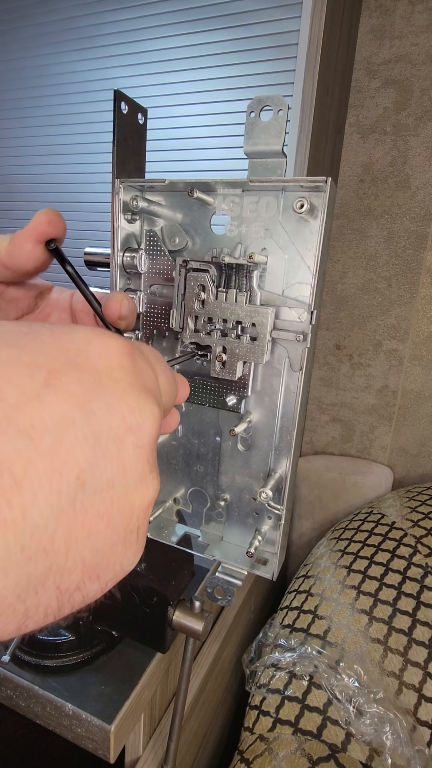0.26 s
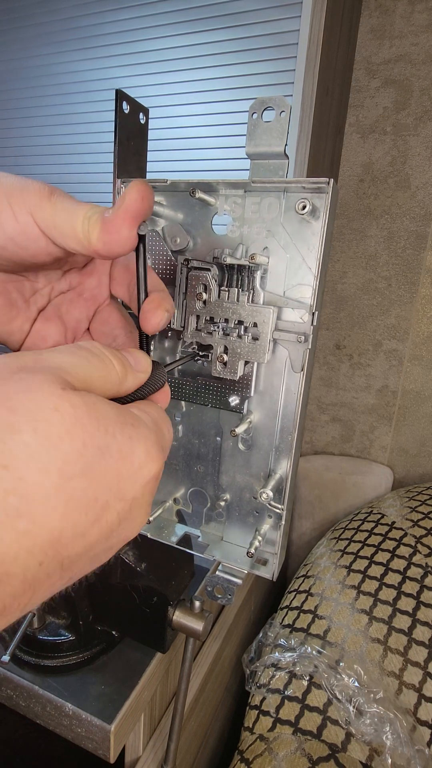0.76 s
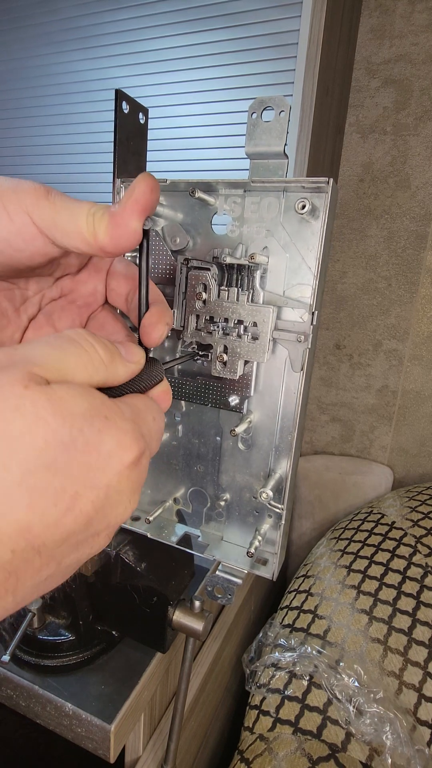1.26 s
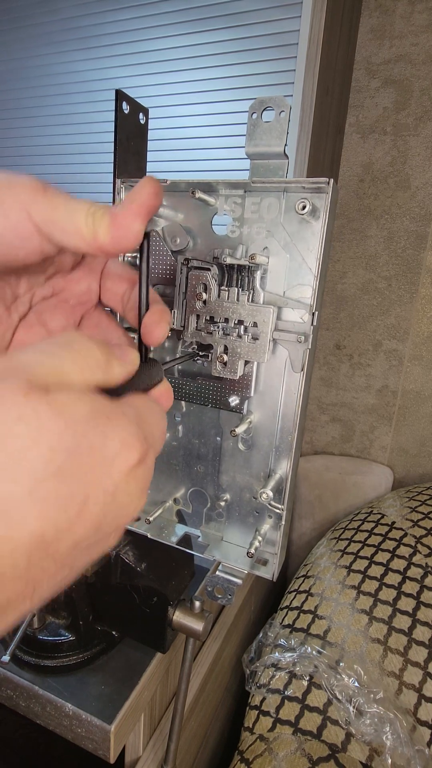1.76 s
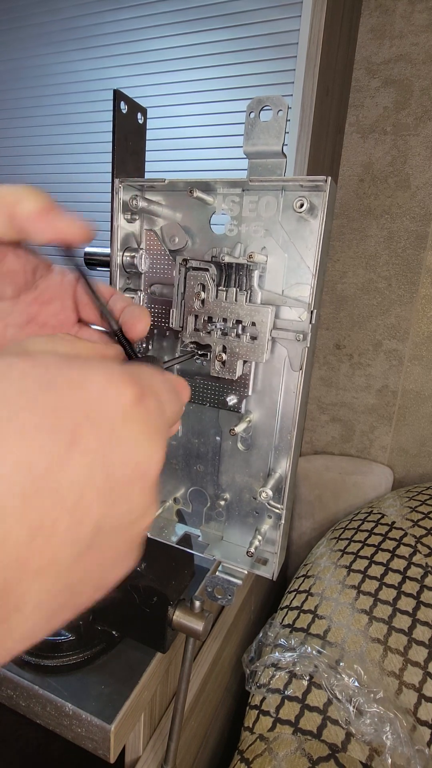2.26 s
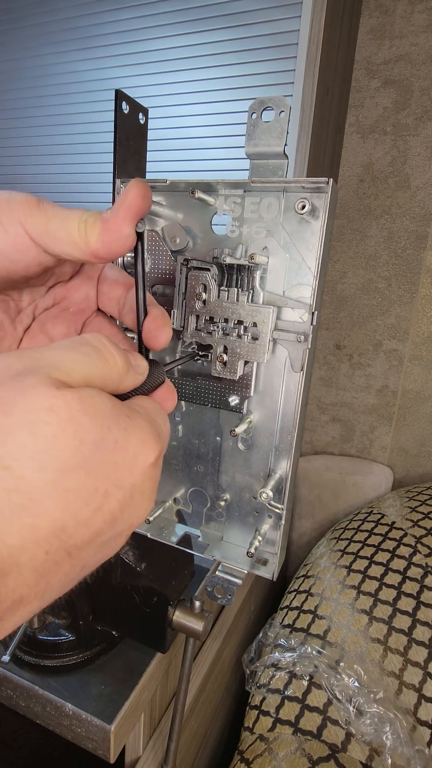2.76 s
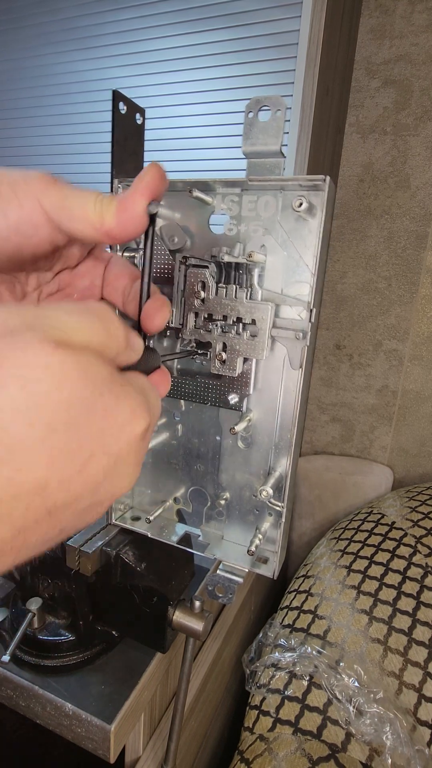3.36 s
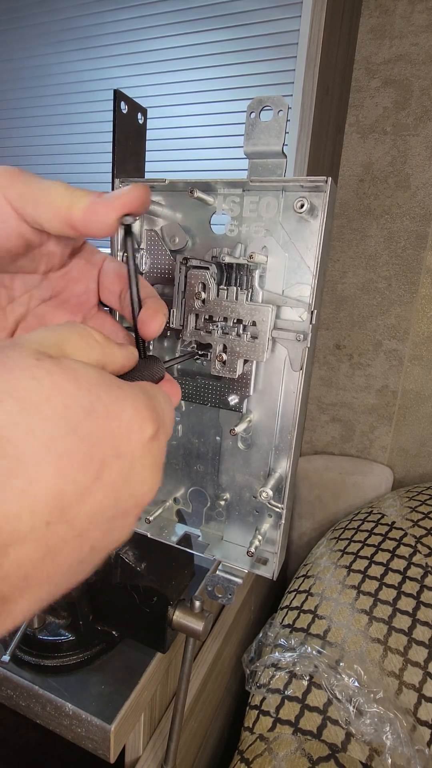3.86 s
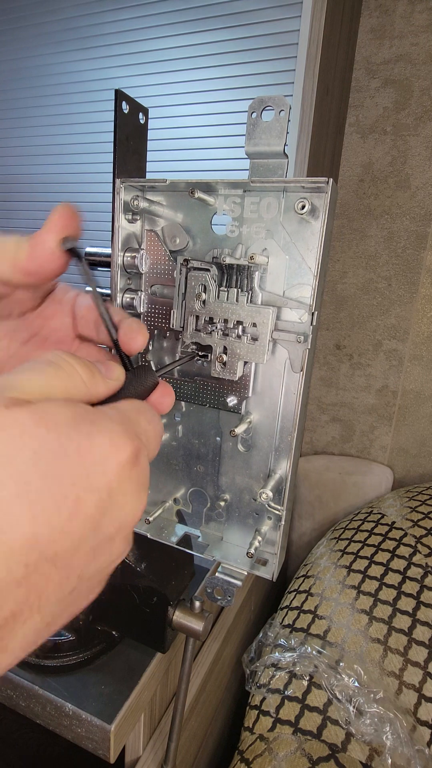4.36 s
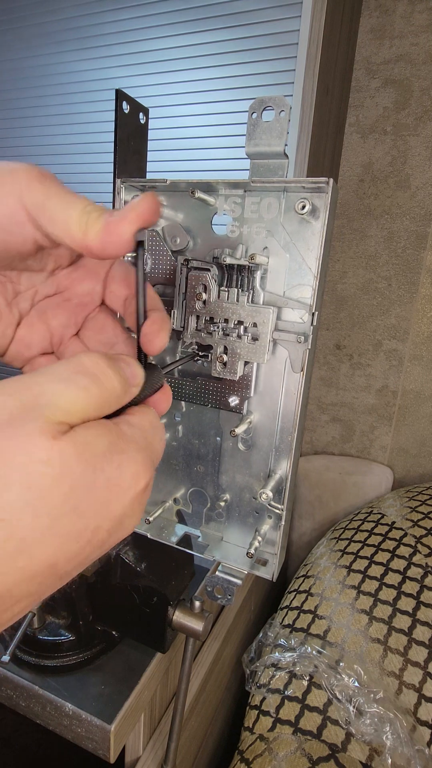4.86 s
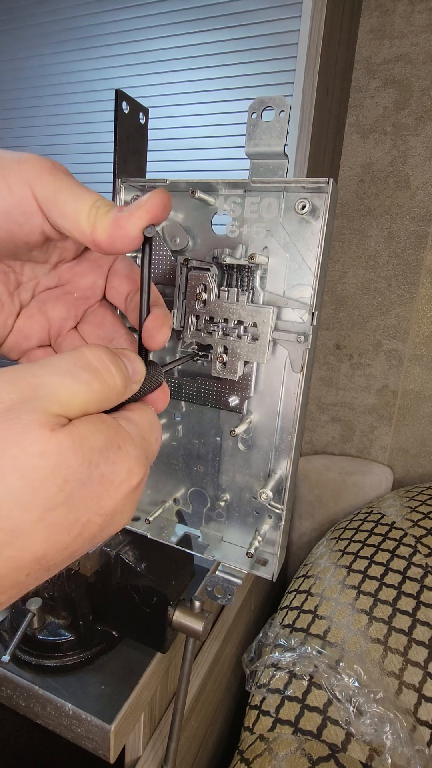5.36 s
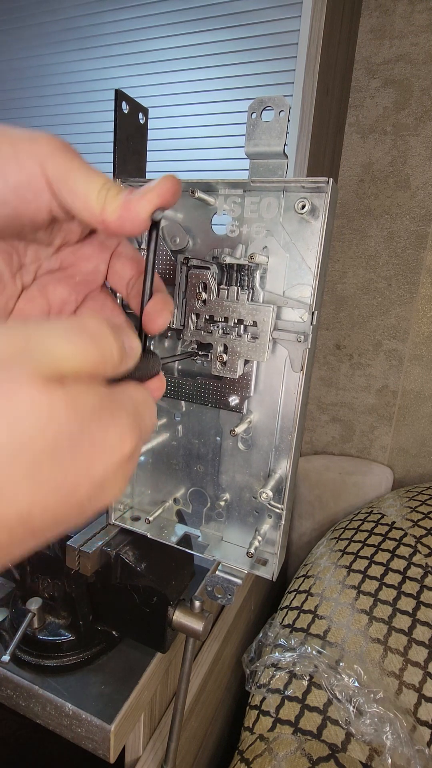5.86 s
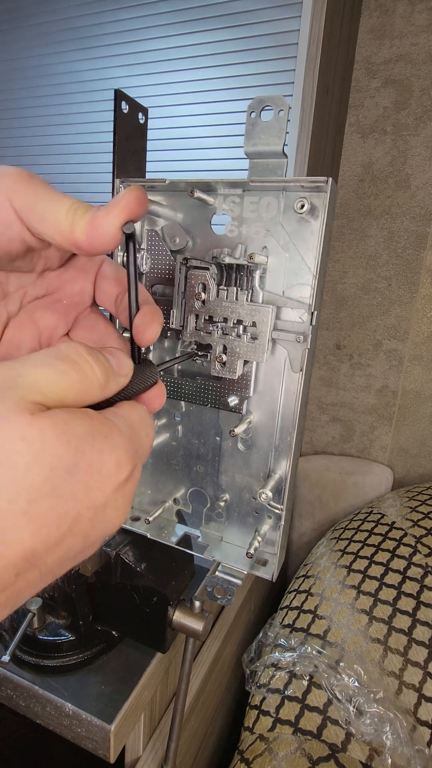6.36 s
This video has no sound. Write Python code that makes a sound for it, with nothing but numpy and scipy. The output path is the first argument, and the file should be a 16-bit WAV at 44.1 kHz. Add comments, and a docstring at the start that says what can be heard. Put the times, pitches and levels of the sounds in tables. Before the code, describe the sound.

A pick works the levers of a steel lock clamped in a vice. A quick flurry of hollow metallic clicks opens, then irregular knocks, light ticks and brief scrapes come in bursts. Sprung levers snap back sharply several times, the bolt clunks now and then, and near the end the tool slips with a bright clink. A low rumble from the bench follows the pushing hands, heard close in a small, quiet room.

```python
"""A pick works the levers of a steel safe lock, clamped in a vice in a small room.
Each impact excites damped modes: the pick knocks in the hollow case, the bolt clunks, sprung levers
snap back and the slipping tool rings. Stick-slip friction makes the pick scrape and squeak.
The pushing hands drive the low resonances of the bench, a rumble over quiet air and a faint early hum."""
import sys
import numpy as np
from scipy import signal
from scipy.fft import rfft, irfft
from scipy.io import wavfile
from scipy.ndimage import uniform_filter1d

SR = 44100
rng = np.random.default_rng(int(sys.argv[2]) if len(sys.argv) > 2 else 0)


def int16_out(signal):
    """Quantize to a 16-bit WAV file."""
    q = np.round(np.clip(np.atleast_2d(signal).T, -1, 1) * 32767)
    wavfile.write(sys.argv[1], SR, q.astype(np.int16))


N = 292383
T = np.arange(N) / SR
AGE = T[:SR // 2]  # time since an impact, t/s


def undb(db):
    """Amplitude ratio of a level in decibels; all levels here are relative."""
    return 10 ** (np.asarray(db) / 20)


def unit(x):
    """Normalisation to rms 1."""
    return x / np.sqrt(np.mean(x ** 2) + 1e-18)


def lookup(points, hz):
    """Interpolation of (f/Hz, value) points on a logarithmic frequency axis."""
    f, value = np.transpose(points)
    return np.interp(np.log(hz + 1), np.log(f), value)


def noise(spectrum, size=N, coherent_hz=1500):
    """Stereo noise shaped by (f/Hz, level/dB) points; long waves are coherent at both microphones."""
    mid, side = rfft(rng.standard_normal((2, size)))
    hz = np.fft.rfftfreq(size, 1 / SR)
    apart = hz / np.hypot(hz, coherent_hz)
    pair = (mid + np.array([[1], [-1]]) * apart * side) / np.hypot(1, apart)
    return unit(irfft(pair * undb(lookup(spectrum, hz)), size))


def add(out, t, sound):
    """Superposition of a sound that starts at time t."""
    start = int(np.clip(t * SR, 0, N - 1))
    out[..., start:start + sound.shape[-1]] += sound[..., :N - start]


def swell(rise_s):
    """Critically damped envelope, peaking at 1 after rise_s."""
    return AGE / rise_s * np.exp(1 - AGE / rise_s)


def cracks(times, levels, spectrum, rise_s, scatter_db=3.5):
    """Modal overlap: an impact excites so many damped plate modes that they merge into a noise burst."""
    out, size = np.zeros((2, N)), SR // 10
    hz, shape_db = np.transpose(spectrum)
    for t, db, rise in zip(times, levels, rise_s * np.ones(len(times))):
        colour = np.transpose([hz, shape_db + scatter_db * rng.standard_normal(len(hz))])
        add(out, t, undb(db) * swell(rise)[:size] * noise(colour, size))
    return out


def rings(times, levels, modes, scatter_db=3):
    """Free vibration: sinusoids decay exponentially, with new random weights at each onset."""
    out = np.zeros((2, N))
    hz, mode_db, t60 = np.transpose(modes)
    waves = np.exp((2j * np.pi * hz - np.log(1000) / t60)[:, None] * AGE)
    for t, db in zip(times, levels):
        weight = undb(db + mode_db + scatter_db * rng.standard_normal((2, len(hz))))
        phasor = np.exp(2j * np.pi * rng.random(weight.shape))
        add(out, t, ((weight * phasor) @ waves).imag)
    return out


# hands bearing on the tool: t/s, duration/s, level/dB
PUSHES = [(-0.002, 0.37, -35.5), (0.537, 0.26, -39.5), (1.63, 0.89, -38), (2.714, 0.18, -37),
          (3.394, 0.61, -41), (3.994, 0.24, -32), (4.389, 0.045, -46.5), (4.49, 0.14, -38.5),
          (4.896, 0.21, -42.5), (5.962, 0.11, -37.5), (6.085, 0.082, -44.5), (6.284, 0.035, -51.5),
          (6.417, 0.19, -35)]

def hand_force(attack_s=0.025, let_go_s=0.1, release_db_per_s=104):
    """Driving force: each push builds, holds, and relaxes exponentially from let_go_s before its end."""
    force = np.zeros(N)
    for start, duration, db in PUSHES:
        attack = np.clip((T - start) / attack_s + 1, 0, 1) ** 2
        relaxing_s = np.maximum(T - start - max(duration - let_go_s, 0), 0)
        force = np.maximum(force, attack * undb(db - release_db_per_s * relaxing_s))
    return force


# spectra of the shaking bench and the grinding pick: f/Hz, level/dB
BENCH_SPECTRUM = [(20, -53.5), (45, -12.5), (66, 3), (80, -8.5), (104, 9), (145, 0.5), (168, -20),
                  (196, -2), (250, -14), (500, -24.5), (900, -41.5)]
GRIND_SPECTRUM = [(400, -19), (780, -14), (980, -3), (1250, -10), (1650, -15), (3500, -24.5),
                  (6000, -30.5), (12000, -48.5)]

def bench_rumble(force, shake_db=-7, grind_db=-16.5):
    """Forced vibration: the hands shake vice and bench, and grind the pick lightly in the case."""
    shake = noise(BENCH_SPECTRUM)
    shake /= np.sqrt(uniform_filter1d(np.mean(shake ** 2, axis=0), size=2600))  # evens out the level
    grit_db = 6.13 * unit(uniform_filter1d(rng.standard_normal(N), size=300))
    grind = noise(GRIND_SPECTRUM) * undb(grit_db)
    return force * (undb(shake_db) * shake + undb(grind_db) * grind)


# hum partials and spectrum of the room air: f/Hz, level/dB
HUM_PARTIALS = [(72, -67.5), (145.3, -66)]
AIR_SPECTRUM = [(25, -24), (60, -3.5), (110, -2.5), (200, -6), (380, 1.5), (700, -6.5), (950, -2.5),
                (1700, -16.5), (3500, -22.5), (7000, -26), (9000, -30.5), (16000, -29.5)]

def background(hum_end_s=1.8, fade_s=0.14):
    """Noise floor: steady broadband air, with a faint hum and a soft rush that stop early on."""
    hum = sum(undb(db) * np.sqrt(2) * np.sin(2 * np.pi * (hz * T + rng.random()))
              for hz, db in HUM_PARTIALS)
    rush = undb(-69.5) * noise([(30, 11), (130, -25.5), (350, 8), (1000, -6.5), (2000, -10), (8000, -24)])
    fade = np.clip((hum_end_s - T) / fade_s, 0, 1)
    return undb(-68.5) * noise(AIR_SPECTRUM) + (hum + rush) * fade


# modes of the lock case: f/Hz, level/dB, rise time/s
CASE_MODES = [(553, -26.5, 0.0077), (879, -10, 0.0039), (989.4, -2, 0.0041), (1063, -7, 0.0041),
              (1602, -27, 0.015)]

def case_note(times, levels, spread=0.03, left_lead_rad=0.8):
    """Resonance: the struck case gives a short hollow note, leading in phase on the left."""
    out, size = np.zeros((2, N)), SR // 20
    lead = np.array([[left_lead_rad], [0]])
    for t, db in zip(times, levels):
        for hz, mode_db, rise_s in CASE_MODES:
            detuned_hz = hz * (1 + spread * rng.standard_normal())
            phase = 2 * np.pi * (detuned_hz * AGE[:size] + rng.random())
            add(out, t, undb(db + mode_db) * swell(rise_s)[:size] ** 1.5 * np.sin(phase + lead))
    return out


# pick striking the case: t/s, case level/dB, contact level/dB, treble level/dB, jolt level/dB
KNOCKS = [(0.01, -28, -29.5, -27.5, -32), (0.058, -30, -31.5, -33.5, -45.5), (0.106, -26, -29, -27, -27),
          (0.112, -22.5, -27, -27.5, -38), (0.133, -22, -27, -26.5, -43), (0.157, -35, -24, -25, -31.5),
          (0.191, -20, -27, -37, -34.5), (0.275, -41, -40, -39, -34.5), (0.495, -43, -46.5, -51, -40),
          (0.618, -24.5, -35, -42, -35), (1.626, -30.5, -41.5, -64, -31), (1.716, -39, -38, -72.5, -35),
          (1.896, -40.5, -54, -45, -38), (1.964, -36.5, -46, -50, -38.5), (2.174, -40, -45, -49.5, -39),
          (2.25, -28, -40, -68, -42), (2.276, -34, -32.5, -30, -36), (2.359, -22, -30, -30.5, -31.5),
          (2.746, -18.5, -33.5, -33, -31), (2.765, -26, -32, -29, -47), (2.868, -38, -48, -37, -51),
          (3.396, -32.5, -40, -67, -31), (3.465, -35, -40.5, -57.5, -40), (3.497, -36.5, -37.5, -50, -38),
          (3.681, -32, -47, -52.5, -34), (3.785, -44, -47, -70, -37), (3.882, -37, -27.5, -13, -47),
          (3.961, -36, -43, -48.5, -48), (4.002, -26.5, -28, -53, -31), (4.077, -36.5, -41, -30.5, -29),
          (4.139, -31, -25, -20.5, -26.5), (4.195, -30.5, -55, -60.5, -46), (4.404, -27, -34, -32.5, -42.5),
          (4.495, -26, -29.5, -58, -36), (4.523, -20.5, -31, -43, -31), (4.99, -34.5, -38.5, -51, -61),
          (6.096, -41.5, -55, -63, -39), (6.415, -35.5, -38.5, -36.5, -38),
          (6.585, -32.5, -45.5, -58, -38.5)]
# spectra of the steel contact and its bright edge: f/Hz, level/dB
CONTACT_SPECTRUM = [(200, -9.5), (500, -5), (750, 2.5), (1250, -1.5), (1600, 5), (2300, 1), (3200, -4.5),
                    (5000, -10.5), (8000, -42)]
TREBLE_SPECTRUM = [(3000, -16), (5500, -1), (8000, -2.5), (10500, -5.5), (15500, -8.5)]

def knocks():
    """Impact excitation: the pick grazes a lever, then strikes it, and the case resonates."""
    t, case_db, contact_db, treble_db, _ = np.transpose(KNOCKS)
    graze = case_note(t - .013, case_db - 13.5)
    contact = cracks(t - .001, contact_db, CONTACT_SPECTRUM, rise_s=0.0032)
    contact += cracks(t - .001, treble_db - 12, TREBLE_SPECTRUM, rise_s=0.0025)
    note = graze + case_note(t - .002, case_db + .5)
    return contact + note, undb(-2.5) * contact + undb(-5.5) * note


# modes of the rocking bench: f/Hz, level/dB
BENCH_MODES = [(66, -16), (109, 0), (140, -13), (197, -16), (300, -20.5)]

def bench_jolts(clunk_db=-37.5, spread=0.04, rise_s=0.021):
    """Transient response: every knock, snap and clunk rocks the bench for a few slow cycles."""
    blows = [(row[0], row[-1]) for row in KNOCKS + SNAPS] + [(row[0], clunk_db) for row in CLUNKS]
    out, size = np.zeros(N), SR // 5
    swing = swell(rise_s)[:size] ** 2.8
    for t, db in blows:
        for hz, mode_db in BENCH_MODES:
            detuned_hz = hz * (1 + spread * rng.standard_normal())
            phase = 2 * np.pi * (detuned_hz * AGE[:size] + rng.random())
            add(out, t, undb(db + mode_db) * swing * np.sin(phase))
    return out


def stray_taps(force, taps_per_s=7, scatter_db=3):
    """Random impacts: the pick taps about lightly, with amplitude proportional to the hand force."""
    slots = np.arange(int(taps_per_s * N / SR))
    t = (slots + rng.random(len(slots))) / taps_per_s
    db = 20 * np.log10(np.interp(t, T, force) + 1e-9) + scatter_db * rng.standard_normal(len(t))
    taps = case_note(t, db - 10) + cracks(t, db - 15, CONTACT_SPECTRUM, rise_s=0.003)
    return taps, undb(1.5) * taps


# bolt meeting its stop: t/s, case level/dB, rattle level/dB, treble level/dB, rise time/s
CLUNKS = [(0.168, -25, -28, -32.5, 0.0063), (0.646, -19, -25, -63, 0.0064),
          (2.769, -20.5, -25.5, -45.5, 0.0081), (4.529, -23, -27, -46.5, 0.0076),
          (4.892, -16.5, -31.5, -47.5, 0.017)]
# spectrum of its rattle: f/Hz, level/dB
RATTLE_SPECTRUM = [(120, -6), (300, 4.5), (420, 0.5), (560, 4), (800, 2.5), (1300, 2.5), (2000, 0.5),
                   (3100, -1), (5000, -10.5), (8000, -20.5), (16000, -20)]

def bolt_clunks():
    """Inelastic collision: the heavy bolt lands, crunches home and sounds the case."""
    t, case_db, rattle_db, treble_db, rise_s = np.transpose(CLUNKS)
    rattle = cracks(t - .003, rattle_db - 3.5, RATTLE_SPECTRUM, rise_s)
    rattle += cracks(t + .0036, treble_db, TREBLE_SPECTRUM, rise_s)
    note = case_note(t - .0015, case_db - 1)
    return rattle + note, undb(-3.5) * rattle + undb(-6) * note


# ticks of the wire tip: t/s, level/dB
TICKS = [(0.603, -45.5), (1.171, -37), (1.5869, -40), (2.9737, -47), (3.3076, -33.5), (4.046, -31),
         (4.4016, -42), (4.5365, -44), (4.7175, -49.5), (4.736, -45), (5.0638, -40.5), (5.0978, -47),
         (5.1187, -39), (5.3716, -47.5), (5.8374, -41), (5.883, -48)]
# spectrum of a tick: f/Hz, level/dB
WIRE_SPECTRUM = [(300, -5.5), (700, -13.5), (1000, 7), (1250, 2), (1600, 4.5), (2600, -1.5), (4200, 5.5),
                 (6000, -11.5), (7400, 0), (8600, -23), (10000, -7), (15500, -12)]
# modes of the wire: f/Hz, level/dB, T60/s
WIRE_MODES = [(4070, 4, 0.09), (4100, -1.5, 0.34), (4300, -2, 0.32), (4030, -3.5, .35), (7200, -11.5, .2),
              (7040, -7, 0.15), (7300, -8.5, 0.2), (10050, -7, .1)]

def wire_ticks():
    """Plucking: the wire tip drops off an edge, vibrates freely and nudges the case."""
    t, db = np.transpose(TICKS)
    tick = cracks(t - .0005, db + .5, WIRE_SPECTRUM, rise_s=0.0022) + case_note(t + .00076, db - 3.5)
    ring = rings(t, db - 19.5, WIRE_MODES, scatter_db=2)
    return tick + ring, undb(-4.5) * tick + undb(-5.5) * ring


# pick brushing a lever spring: t/s, level/dB
PINGS = [(0.637, -67), (2.727, -73)]
# modes of the spring: f/Hz, level/dB, T60/s
SPRING_MODES = [(10630, 19, 0.19), (10900, -9, 0.36), (10700, -2, .3)]

def spring_pings():
    """Free vibration: a thin spring, once brushed, sings at its very high natural frequencies."""
    t, db = np.transpose(PINGS)
    ring = rings(t, db, SPRING_MODES)
    return ring, ring


# wire dragged over a lever: t/s, duration/s, first slip rate/Hz, last slip rate/Hz,
# relative jitter of the period, level/dB, level change/dB, spectral tilt/(dB/octave)
SCRAPES = [(1.12, .055, 166, 113, 0.2, -38.5, -3, 1), (1.282, 0.018, 300, 198, 0.2, -46, -0.5, 0),
           (1.581, .025, 190, 210, 0.25, -49.5, 0, 4.5), (3.016, .034, 240, 220, .15, -46, -4.5, 0.5),
           (3.205, 0.12, 308, 333, 0.03, -39.5, -11, 1)]
# spectrum of one slip: f/Hz, level/dB
SLIP_SPECTRUM = [(300, -15), (650, -5), (1000, 11), (1250, -2), (1600, 4.5), (2600, -8), (4000, 4.5),
                 (5300, -3), (6200, -9), (7400, -6.5), (8600, -8), (10000, -2.5), (12000, -8), (14000, -2),
                 (15500, -10)]

def scrapes(slip_rise_s=0.0014):
    """Stick-slip friction: each slip excites the same short resonance, so an even run has a pitch."""
    drag = np.zeros((2, N))
    hz, shape_db = np.transpose(SLIP_SPECTRUM)
    for t, duration, first_rate, last_rate, jitter, db, change_db, tilt in SCRAPES:
        progress = np.linspace(0, 1, int(duration * (first_rate + last_rate) / 2) + 1)
        timing, scatter_db = rng.standard_normal((len(progress), 2)).T
        period = (1 + jitter * timing) / (first_rate + (last_rate - first_rate) * progress)
        tilted = np.transpose([hz, shape_db + tilt * np.log2(hz)])
        slip = swell(slip_rise_s) * noise(tilted, len(AGE))
        for delay, slip_db in zip(np.cumsum(period) - period[0], db + change_db * progress + scatter_db):
            add(drag, t + delay, undb(slip_db) * slip)
    return drag, undb(-3) * drag


# faint pure tone: f/Hz, level/dB, T60/s
FAINT_TONE = [(968, 0, 0.72)]

def faint_tone():
    """Exponential decay: a faint tone of steady pitch near 970 Hz starts at 1.3 s and fades slowly."""
    return rings(times=[1.298], levels=[-55], modes=FAINT_TONE, scatter_db=1.5)


# levers springing back: t/s, treble level/dB, body level/dB, case level/dB, jolt level/dB
SNAPS = [(1.7883, -11, -18.5, -26.5, -32.5), (2.052, -12.5, -19.5, -27, -33), (3.554, -10, -16.5, -14, -29),
         (3.8651, -15.5, -24.5, -18.5, -47), (4.1572, -22, -24, -28, -30), (6.4425, -12, -20.5, -20.5, -31)]
# spectra of the treble and body of a snap: f/Hz, level/dB
SNAP_TREBLE_SPECTRUM = [(4000, -15.5), (6200, -6.5), (6850, -8), (7480, 3), (8200, -12), (9200, -2.5),
                        (9850, -4), (10330, 4.5), (11100, -7), (11800, 0), (12350, -4), (13400, 3.5),
                        (14750, -4.5), (15500, -5)]
SNAP_BODY_SPECTRUM = [(200, -35), (550, -20.5), (1300, -1.5), (1900, -1.5), (2400, 3.5), (2950, -0.5),
                      (3400, 4), (3950, -2), (4750, -6), (5300, 2), (5800, -5.5), (7000, -19.5)]
# modes of a lever: f/Hz, level/dB, T60/s
LEVER_MODES = [(2326, -6, .16), (3400, -4, .12), (5250, -9, .12), (6250, -7, .12), (7540, -3, .14),
               (9940, -3, .15), (10210, -1, .16), (10400, 0, .16), (12130, -6, .11), (13260, -3, .12),
               (13750, -3, .14), (14320, -4, .14), (15250, -5, .12)]

def lever_snaps():
    """Release of elastic energy: a sprung lever skids off its edge, cracks against its stop and rings."""
    t, treble_db, body_db, case_db, _ = np.transpose(SNAPS)
    skid = cracks(t - .012, body_db - 20.5, CONTACT_SPECTRUM, rise_s=0.022)
    crack = cracks(t - .0005, treble_db - 3, SNAP_TREBLE_SPECTRUM, rise_s=0.0017, scatter_db=1.5)
    crack += cracks(t - .0005, body_db + .5, SNAP_BODY_SPECTRUM, rise_s=0.0019, scatter_db=1)
    ring = rings(t, treble_db - 32.5, LEVER_MODES)
    note = case_note(t, case_db - .5)
    return skid + crack + ring + note, undb(-3.5) * crack + undb(-6) * ring + undb(-8.5) * note


# dry steel squeaking: t/s, duration/s, start f/Hz, end f/Hz, level/dB
SQUEAKS = [(2.294, 0.0505, 1751, 1618, -33.5), (2.674, 0.1, 2300, 1807, -48)]

def squeaks(waver_hz=55, rough_db=4, octave_db=-19):
    """Friction-driven oscillation: slips follow fast enough to fuse into a falling, unsteady pitch."""
    out = np.zeros((2, N))
    for t, duration, start_hz, end_hz, db in SQUEAKS:
        size = int(duration * SR)
        wander, grip = unit(uniform_filter1d(rng.standard_normal((2, size)), size=110))
        phase = 2 * np.pi * np.cumsum(np.linspace(start_hz, end_hz, size) + waver_hz * wander) / SR
        tone = np.sin(phase) + undb(octave_db) * np.sin(2 * phase)
        add(out, t, undb(db + rough_db * grip) * np.hanning(size) * tone)
    return out, undb(-3.5) * out


# bounces of the slipping tool: t/s, level/dB
CLINKS = [(5.948, -21.5), (5.9513, -21), (5.957, -27)]
# spectrum of a bounce: f/Hz, level/dB
TOOL_SPECTRUM = [(500, -18.5), (2200, -4), (2900, -22), (3700, 5), (4700, -15.5), (6200, 0), (7500, -2.5),
                 (8500, -18), (10300, -2), (11500, -10.5), (15500, -10.5)]
# modes of the tool: f/Hz, level/dB, T60/s
TOOL_MODES = [(3600, -5, .27), (3655, -1, .3), (3740, -5, .26), (3935, -6, .26), (5250, -12, .3),
              (6083, -6, .27), (6309, -6, .3), (6430, -8, .3), (7337, -7, .33), (7550, -8, .26),
              (9819, -10, .18), (10480, -7, .22), (13710, -13, .13)]

def tool_clinks():
    """Rebound: the steel tool slips, chatters and rings on; its last bounce knocks the case."""
    t, db = np.transpose(CLINKS)
    chatter = cracks(t, db, TOOL_SPECTRUM, rise_s=0.0017, scatter_db=0.5)
    ring = rings(t, db - 25, TOOL_MODES)
    note = case_note(t[-1:], db[-1:] + .5)
    return chatter + ring + note, undb(-5.5) * (chatter + ring) + undb(-10) * note


# reverberation time of the room: f/Hz, T60/s
ROOM_T60 = [(100, 0.69), (300, 0.44), (900, 0.22), (2000, 0.36), (5000, 0.35), (9000, 0.35), (15000, 0.25)]

def room(feed, onset_s=0.00077):
    """Reverberation: a diffuse field builds quickly and decays exponentially, the bass lasting longest."""
    white = noise([(20, 0), (20000, 0)], size=SR)
    hz, t, cells = signal.stft(white, SR, nperseg=256)
    build = 1 - np.exp(-(t / onset_s) ** 2)
    decay = np.exp(-np.log(1000) * t / lookup(ROOM_T60, hz)[:, None])
    response = signal.istft(cells * build * decay, SR)[1]
    return signal.fftconvolve(feed, unit(response) / np.sqrt(response.shape[1]), axes=1)[:, :N]


def scene(bench_delay_s=0.00016):
    """Superposition: the lock in its room, a faint tone, the bench underneath, and the noise floor."""
    force = hand_force()
    # each of these gives a pair: direct sound, and what it sends into the room
    direct, feed = np.sum([knocks(), bolt_clunks(), lever_snaps(), tool_clinks(), wire_ticks(),
                           spring_pings(), scrapes(), squeaks(), stray_taps(force)], axis=0)
    foreground = direct + faint_tone() + room(feed)
    left, right = bench_rumble(force) + bench_jolts()
    bench = np.array([left, np.interp(T - bench_delay_s, T, right)])  # reaches the left side first
    return foreground * undb([[-.4], [.4]]) + bench * undb([[-.8], [.8]]) + background()


def record(dry, low_hz=41, top_hz=16000):
    """Band limiting: the phone thins the deepest bass and cuts the top."""
    thinned = signal.sosfilt(signal.butter(3, low_hz, "highpass", fs=SR, output="sos"), dry)
    return signal.sosfilt(signal.ellip(10, .2, 80, top_hz, fs=SR, output="sos"), thinned)


dry = scene()
out = record(dry)
int16_out(out)
```